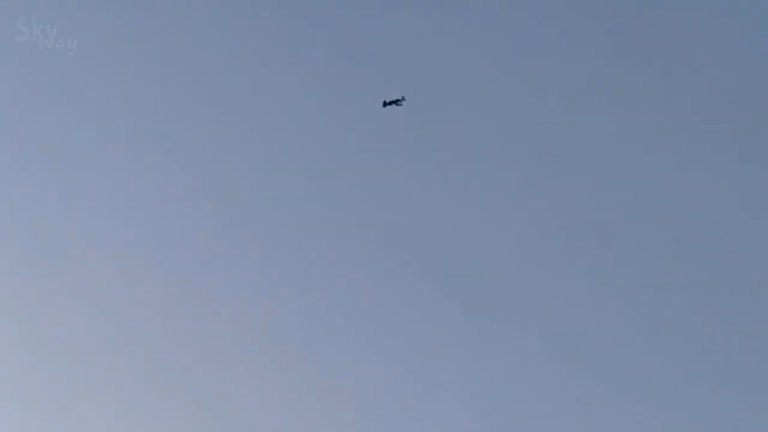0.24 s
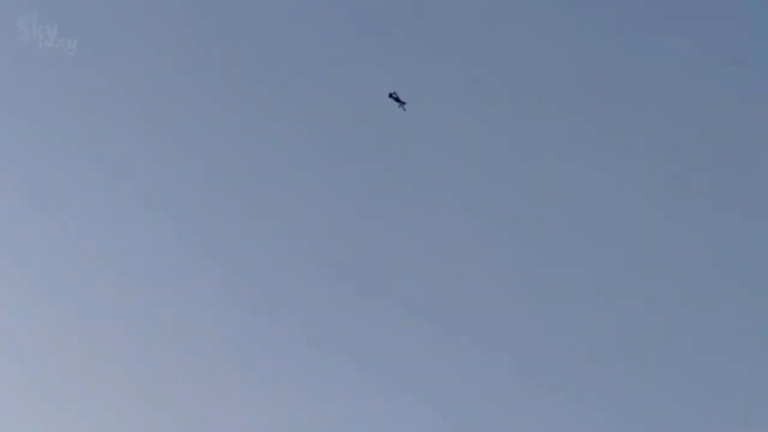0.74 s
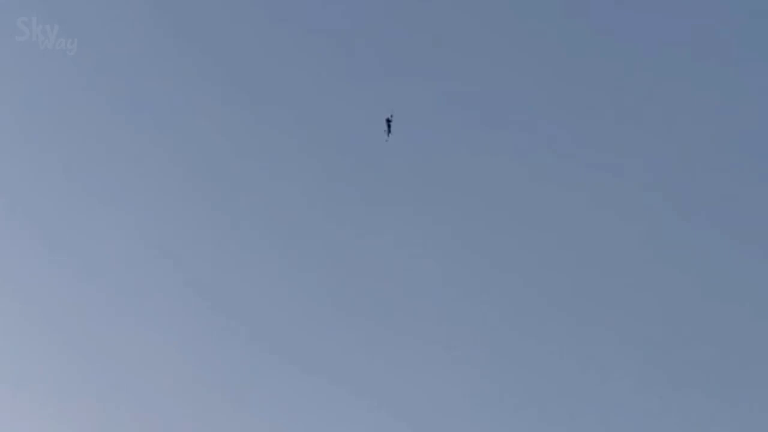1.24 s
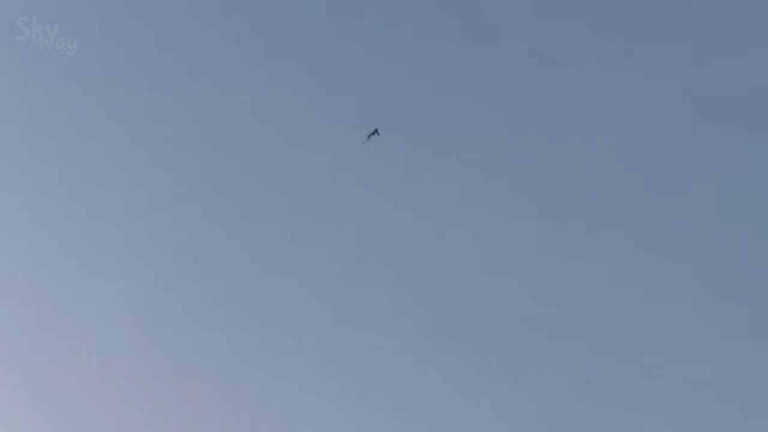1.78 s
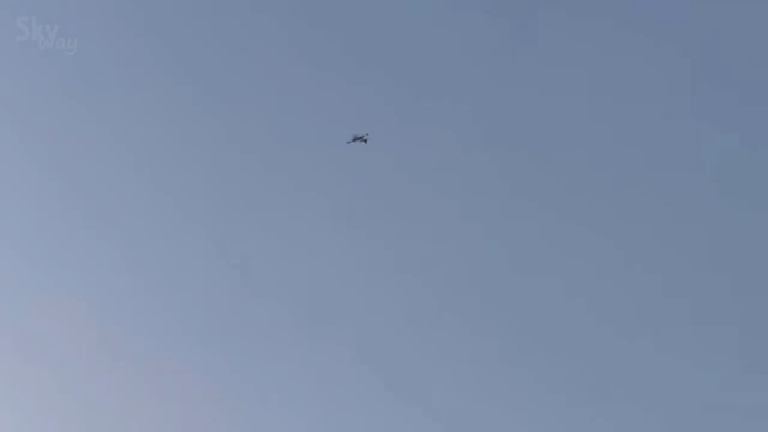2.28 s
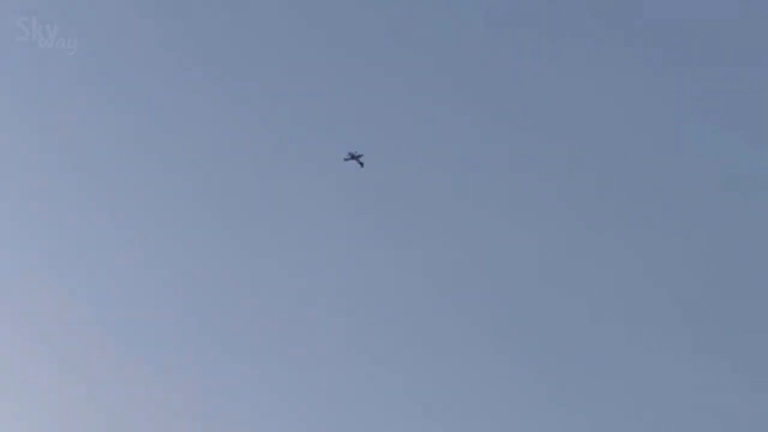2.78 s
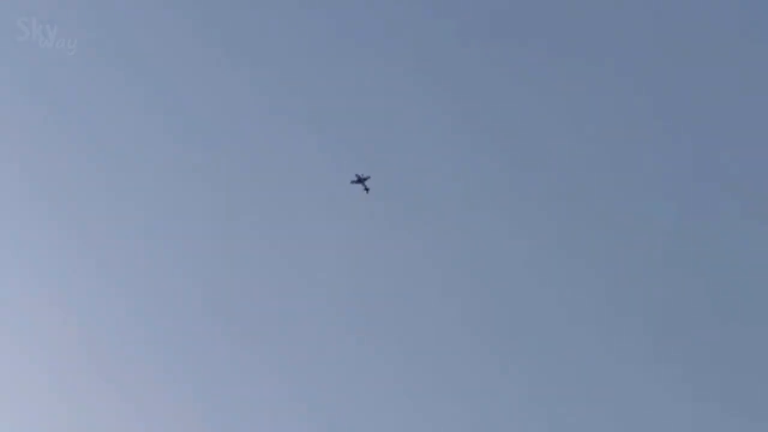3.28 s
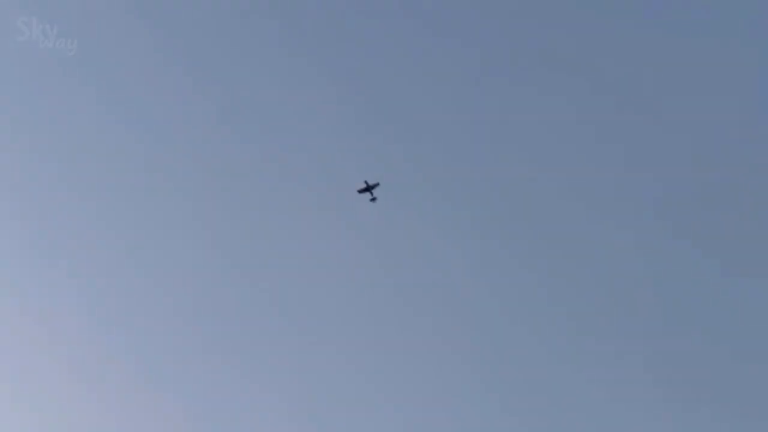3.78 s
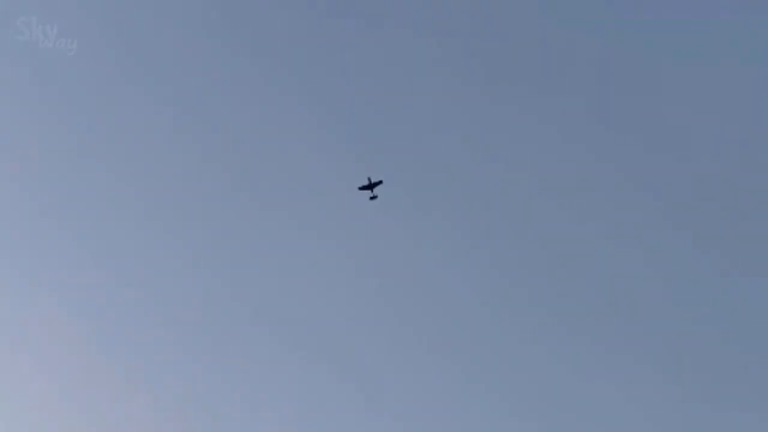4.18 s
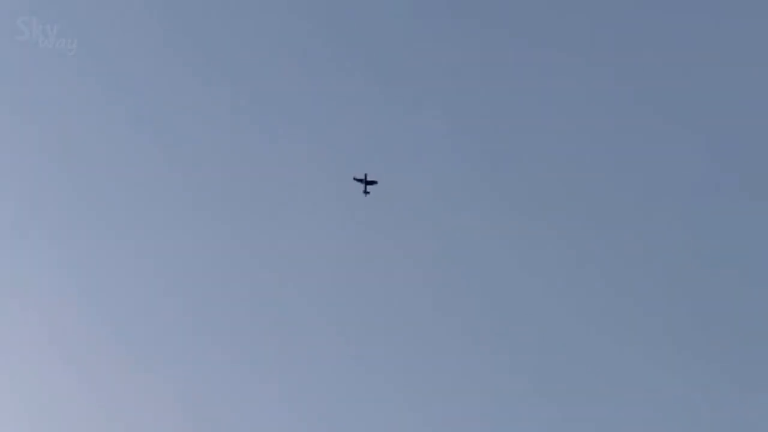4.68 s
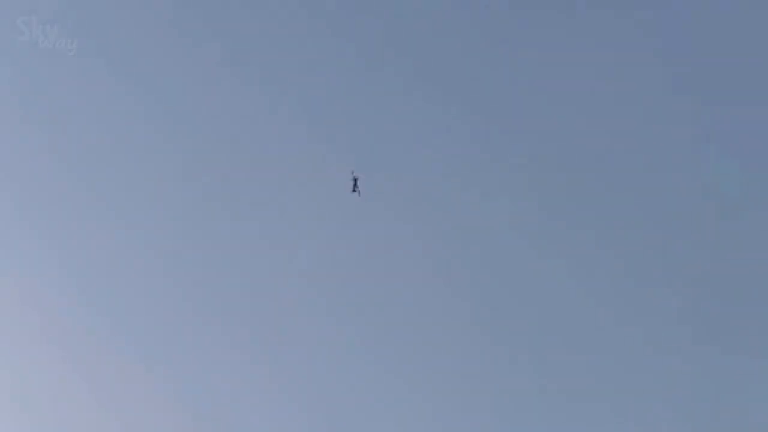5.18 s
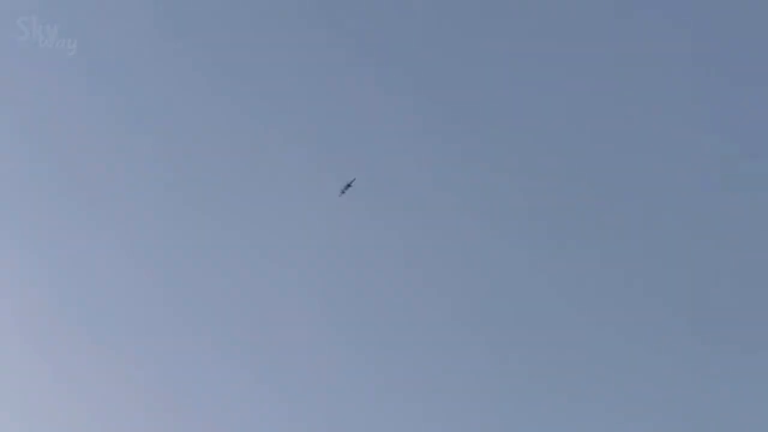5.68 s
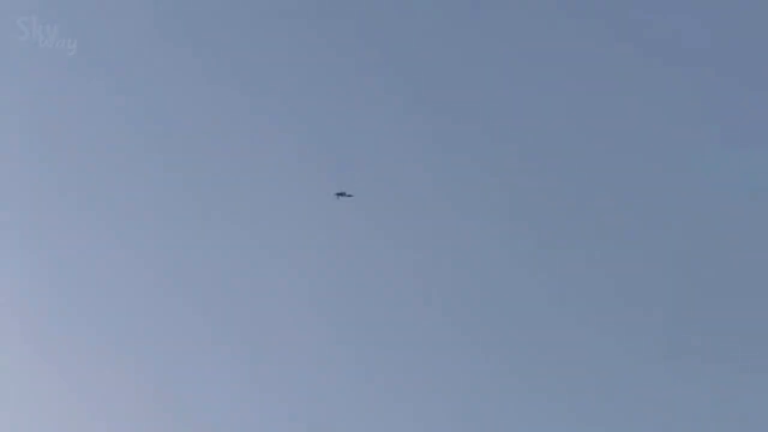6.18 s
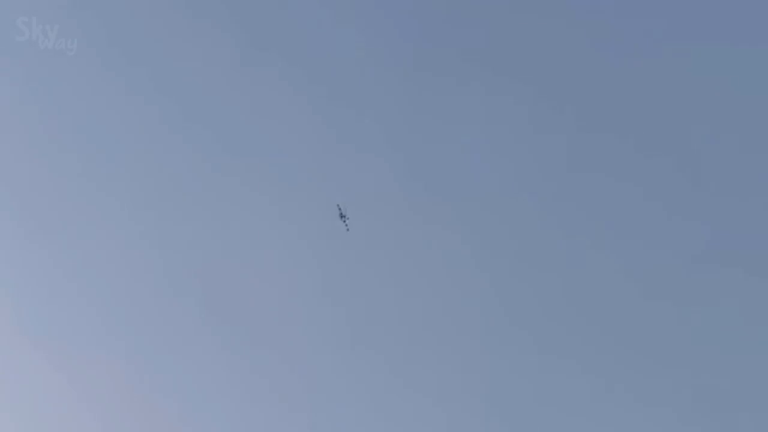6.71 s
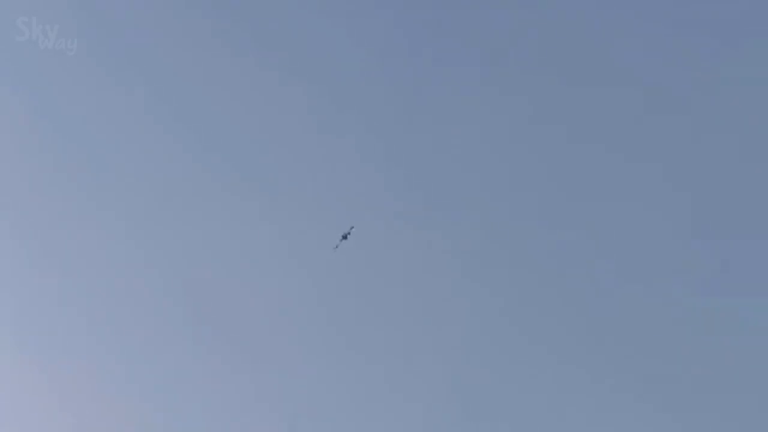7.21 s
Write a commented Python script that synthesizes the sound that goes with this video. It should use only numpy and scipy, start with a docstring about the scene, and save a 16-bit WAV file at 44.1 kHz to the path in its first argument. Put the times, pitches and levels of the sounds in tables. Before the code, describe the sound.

High above an open field, a small piston aeroplane drones steadily, a low buzzing hum with rough, fluttering exhaust rasp. The sound ebbs, crackles in quick gusts, then swells to a hard blade snarl around five seconds before weakening, with brief dropouts and a slowly rising pitch. Light low wind rumbles and soft thumps touch the close stereo microphone on the ground.

```python
"""A small six-cylinder aeroplane with a three-blade propeller, high above an open field, heard from the ground.
Blades and firings share one tone; uneven cylinders add lines between its multiples, made of wavering cosines.
Gas and blade wash rasp once a firing, as pulsed noise bands; the blades crack while their plane faces the listener.
The field returns a later, duller copy. Light wind rumbles and thumps on a two-port microphone, and a low
noise flutter sounds in short spells, opposite in the two channels."""
import sys
import numpy as np
from scipy import signal
from scipy.fft import rfft, irfft, next_fast_len
from scipy.io import wavfile
from scipy.ndimage import map_coordinates

SR = 44100
rng = np.random.default_rng(int(sys.argv[2]) if len(sys.argv) > 2 else 0)


def materialize(psi):
    """Save the field psi as 16-bit PCM at rate SR to the path in sys.argv[1].

    A 1-D psi becomes a single channel; in a 2-D psi each row is a channel.
    """
    bounded = np.clip(np.atleast_2d(psi).T, -1, 1)
    quanta = np.round(bounded * 32767).astype(np.int16)
    wavfile.write(sys.argv[1], SR, quanta)


N = 328545  # samples

# Bounce off the field. Each row: time in seconds, lag behind the direct sound in ms.
BOUNCE_LAG = [(0, 9.12), (1.3, 9.21), (2.8, 9.21), (4.75, 9.0), (7.45, 8.89)]
BOUNCE_GAIN = 0.47
CYLINDERS = 6  # firings in an engine cycle of two shaft turns, and as many blade passes
STEP = 8  # slow curves and low tones are worked out on every eighth sample
SLOW_S = np.arange(0, N + 32 * STEP, STEP) / SR


def propeller(turn, hz, tone_dbs):
    """Blade tone and multiples as they arrive, bounce included: cosines that peak together, save the second."""
    # Blade plane towards the listener. Each row: time in seconds, crack level in dB,
    # extra fall in dB per multiple above the 4th.
    crack = [(4.3, -53, 1), (4.53, -36, 7), (4.7, -36, 8), (4.8, -30.5, 1.5), (4.92, -31, 4.5),
             (5.01, -28.5, 3.5), (5.09, -23.5, 0.1), (5.19, -23, 2), (5.245, -26, 5.5), (5.29, -25.5, 1.5),
             (5.4, -28, 2.5), (5.5, -28.5, 2.5), (5.6, -30, 5.5), (5.7, -35, 5), (5.88, -39, 12),
             (6.05, -52, 1), (6.25, -46, 4)]
    # Each row: multiple of the blade tone, dB against the crack level.
    crack_shape = [(4, -1), (5, 0.5), (6, -5.5), (7, -3.5), (8, -7.5), (9, -13), (10, -6.5), (11, -10)]
    # Faint buzz of the high multiples. Each row: time in seconds, level in dB.
    buzz = [(0, -58), (.3, -49), (.55, -46.5), (.8, -50.5), (1.3, -55.5), (2.0, -64.5), (2.6, -51.5),
            (3.0, -56.5), (3.6, -58.5), (4.2, -52.5), (4.6, -49), (4.8, -49), (4.95, -39), (5.12, -43),
            (5.24, -49), (5.4, -44.5), (5.6, -53), (5.85, -50), (6.05, -59), (6.6, -62.5), (7.45, -60)]
    # Each row: multiple of the blade tone, dB against the buzz level.
    buzz_shape = [(4, 0.5), (5, -2), (6, -2.5), (7, 1.5), (8, -0.5), (9, -6.5), (10, 0.5), (11, -1),
                  (12, -7.5), (13, -8.5), (14, -6), (15, -4.5), (16, -6.5), (17, -9), (18, -8)]
    # The blade tone drops out briefly. Each row: time in seconds, depth in dB.
    dropouts = [(6.45, 9), (6.68, 22), (6.871, 15)]
    dropout_s = 0.038
    shake_db = 0.1  # per multiple
    # upper multiples weaker than steady_db fade in and out
    fade_db, fade_rate, steady_db, fade_span_db = 2.5, 14, -32.5, 20

    silent_before = (crack[0][0] - .3, -80, 0)
    silent_after = (crack[-1][0] + .2, -80, 0)
    crack_db, fall_db = curves([silent_before, *crack, silent_after])
    levels = dict(zip((1, 2, 3), tone_dbs))
    for s, depth_db in dropouts:
        levels[1] = levels[1] - depth_db * np.exp(-((SLOW_S - s) / dropout_s) ** 2)
    for k, db in crack_shape:
        levels[k] = crack_db + db - fall_db * (k - 4)
    buzz_db = curves(buzz)[0]
    for k, db in buzz_shape:  # crack and buzz add as powers
        power = undb(levels.get(k, -120)) ** 2 + undb(buzz_db + db) ** 2
        levels[k] = 10 * np.log10(power)

    lag_s = curves(BOUNCE_LAG)[0] / 1000
    out = 0
    for k, db in levels.items():
        # the bounce shifts the phase of what arrives
        shift = np.angle(1 + BOUNCE_GAIN * np.exp(-2j * np.pi * k * CYLINDERS * hz * lag_s))
        sign = -1 if k == 2 else 1  # the second multiple flattens the crests and deepens the troughs
        shake = (.5 + shake_db * min(k, 9)) * walk(35)  # moving air shakes short waves more
        weakness = np.clip((steady_db - db) / fade_span_db, 0, 1)
        fade = (k > 1) * fade_db * weakness * walk(fade_rate)
        phase = k * CYLINDERS * turn + shift + 0.012 * k * walk(20)
        out = out + sign * undb(db + shake + fade) * np.cos(phase)
    return np.sqrt(2) * fill(out)


def exhaust(turn):
    """Uneven cylinders sound multiples of the engine cycle; each line wavers on its own."""
    # Pipes turned away, then towards. Each row: multiple of the cycle, dB against the exhaust level
    # before a small fall with the multiple.
    pipes_away = [(1, -51), (2, -31), (3, -25.5), (4, -29), (5, -27.5), (6, 0), (7, -31), (8, -28),
                  (9, -27), (10, -30), (11, -27), (12, -23), (13, -38), (14, -22), (15, -23), (16, -29.5),
                  (17, -26.5), (18, -28), (19, -34), (20, -25.5), (21, -37), (22, -40), (23, -37.5),
                  (24, -31.5), (25, -34), (26, -25.5), (27, -35.5), (28, -37.5), (29, -40.5), (30, -44),
                  (31, -38.5), (32, -31), (33, -49.5), (34, -39), (35, -46.5), (36, -45), (37, -49),
                  (38, -51), (39, -49.5), (40, -49), (41, -42), (42, -39), (43, -38.5), (44, -35),
                  (45, -36), (46, -37), (47, -32.5), (48, -34.5)]
    pipes_near = [(1, -41), (2, -23), (3, -31.5), (4, -16.5), (5, -21), (6, -6), (7, -28.5), (8, 0.5),
                  (9, -8.5), (10, -12.5), (11, -25), (12, -5), (13, -15), (14, -6), (15, -30), (16, -29),
                  (17, -23), (18, -24), (19, -27.5), (20, -26.5), (21, -33), (22, -32.5), (23, -21.5),
                  (24, -20), (25, -33.5), (26, -32.5), (27, -20.5), (28, -34), (29, -19.5), (30, -23.5),
                  (31, -34.5), (32, -28), (33, -32), (34, -34.5), (35, -30.5), (36, -27), (37, -40.5),
                  (38, -33), (39, -37), (40, -38.5), (41, -23.5), (42, -31), (43, -19.5), (44, -28.5),
                  (45, -45), (46, -35), (47, -34), (48, -39.5)]
    # Each row: time in seconds, exhaust level in dB, share of pipes turned towards the listener (0-1).
    pipe_levels = [(0, -18, 0.03), (1.3, -19, 0.04), (2.4, -25, 0.08), (3.3, -18, 0), (4.2, -21, 0.05),
                   (5.1, -20, 0.31), (6.1, -25, 0.34), (6.4, -23.5, 0.46), (6.8, -27.5, 0.87),
                   (7.15, -29, 0.94), (7.45, -30.5, 0.99)]
    # The 8th multiple swells as the pipes swing round. Each row: time in seconds, rise in dB.
    boom = [(0, -0.5), (6.1, 0.5), (6.5, -0.5), (6.8, -1.5), (7.0, -1.5), (7.2, 2), (7.45, 4)]

    db, near = curves(pipe_levels)
    near = np.clip(near, 0, 1)
    boom_db = curves(boom)[0]
    out = 0
    for (k, away_db), (_, near_db) in zip(pipes_away, pipes_near):
        in_blade_tone = k % CYLINDERS == 0 and k <= 3 * CYLINDERS  # the propeller sounds these
        if k <= 3 or in_blade_tone:
            continue
        line_db = db + (1 - near) * away_db + near * near_db + (k == 8) * boom_db - 0.063 * k
        waver_db = 1.3 * walk(6) + 0.047 * k * walk(30)
        phase = k * turn + 2 * np.pi * rng.random() + 0.016 * k * walk(24)
        out = out + undb(line_db + waver_db) * np.cos(phase)
    return np.sqrt(2) * fill(out)


def rasp(turn):
    """Gas and blade wash: noise bursts on each firing over a steady rush; rows are mid and an unrelated twin."""
    # Each row: time in seconds, low roar, middle rasp and hiss in dB (each band keeps only the
    # departure from its mean), share that pulses with the firings (0-1).
    strength = [(0, -39, -43.5, -51, 0.6), (.22, -35, -37, -47.5, 0.6), (.45, -31.5, -34, -44, 0.62),
                (.65, -35, -35, -48.5, 0.38), (.95, -34.5, -36, -49.5, 0.55),
                (1.25, -39, -36.5, -48.5, 0.71), (1.65, -43.5, -43.5, -58.5, 0.1),
                (2.05, -41, -44.5, -53.5, 0.5), (2.28, -40.5, -41.5, -54, 0.66),
                (2.55, -36.5, -36, -51.5, 0.58), (2.8, -38.5, -44, -55, 0.6),
                (3.15, -41.5, -39.5, -54, 0.68), (3.45, -35, -41.5, -50.5, 0.5), (3.9, -38, -38, -47, 0.61),
                (4.24, -34, -37, -49, 0.59), (4.38, -33.5, -33.5, -44.5, 0.79),
                (4.65, -29, -28.5, -41, 0.65), (5.0, -30.5, -31.5, -40.5, 0.7),
                (5.12, -34.5, -31.5, -44, 0.42), (5.25, -33.5, -32.5, -47.5, 0.34),
                (5.56, -33.5, -34.5, -44, 0.4), (5.75, -33.5, -39, -47, 0.2),
                (5.9, -36.5, -38.5, -51, 0.23), (6.1, -39.5, -39.5, -53, 0.2), (6.5, -43, -41, -55, 0.43),
                (6.85, -37.5, -43, -59, 0.4), (7.45, -44, -43, -56, 0.44)]
    # Each row: frequency in Hz, relative dB per Hz.
    rasp_colour = [(60, -8), (140, -4), (300, -1), (600, 3.5), (1100, -2.5), (2000, -4), (2800, -9),
                   (3600, -17), (4900, -13.5), (6000, -20), (6900, -35.5), (9500, -34), (12000, -37.5),
                   (14000, -37.5), (15500, -45.5)]
    # Swell round a pitch that drifts as the plane turns. Each row: time in seconds, pitch in Hz.
    swell = [(0, 1100), (.3, 1650), (.45, 1430), (.65, 950), (1.1, 1690), (1.8, 1008), (2.4, 1350),
             (3.3, 1349), (3.9, 1620), (4.2, 1010), (4.7, 1980), (5.2, 1095), (5.8, 1900), (6.6, 2400),
             (7.45, 1990)]
    # Each cylinder's burst in relative dB, in firing order.
    cylinder_db = [5.5, 5, 2.5, 6, 3.5, 1.5]
    swell_top_db, swell_octaves = 3, 0.53
    rasp_db = -27  # on the coloured noise

    low_db, mid_db, high_db, pulsed = curves(strength)
    firing = CYLINDERS * turn / (2 * np.pi) + 0.58
    count = firing.astype(int)
    size, timing = rng.standard_normal((2000, 2)).T
    late = 0.074 * timing[count]  # in firings
    pulse = np.exp(0.92 * (np.cos(2 * np.pi * (firing + .5 + late)) - 1))
    burst = pulse * undb(2.4 * size[count] + np.array(cylinder_db)[count % CYLINDERS])
    burst = burst / np.sqrt(np.mean(burst ** 2))

    centres = 250 * 2 ** np.arange(0, 6, 1 / 3)
    out, patch, swell_hz = 0, walk(24), curves(swell)[0]
    for hz, gust_db, noise in zip(centres, gusts(centres), bands(rasp_colour, centres, channels=2)):
        low, high = np.clip(np.log2([1500 / hz, hz / 2200]) * 3.1, 0, 1)
        db = low * low_db + high * high_db + (1 - low - high) * mid_db
        swell_db = swell_top_db * np.exp(-(np.log2(hz / swell_hz) / swell_octaves) ** 2)
        # the bursts stand out most in the middle of the range
        share = np.clip(pulsed * np.exp(-np.log2(hz / 1800) ** 2 / 11), 0, 1)
        gate = 1 - share + share * burst
        gate = gate / np.sqrt(1 - 2 * share * (1 - share) * (1 - burst.mean()))  # pulsing keeps the power
        patch = 0.23 * patch + 0.88 * walk(16)  # neighbours share their flicker
        level_db = db - db.mean() + swell_db + gust_db + 2.5 * pulsed * patch
        out = out + fill(undb(level_db) * gate) * noise
    return out * undb(rasp_db)


def gusts(centres):
    """dB that crackling gusts and ringing streaks add to the rasp: bells in time and pitch, a row per band."""
    # Short gusts. Each row: time in seconds, rise in dB (below zero for a lull), centre in Hz.
    short_gusts = [(.12, 4.5, 2000), (.313, 3.5, 1700), (.37, 4, 1700), (.562, 1.5, 1100), (.62, 7, 1200),
                   (2.335, 9.5, 1380), (2.519, 9, 1495), (2.59, 3, 1300), (2.63, 9.5, 1499),
                   (2.71, 8, 1581), (2.82, 10, 1759), (2.9, 10, 1406), (2.755, -13, 1900), (2.86, 0, 1800),
                   (2.95, 0, 1900), (3.015, 11.5, 1990), (3.065, 6, 1290), (3.11, 7, 1350), (3.15, 2, 1300),
                   (3.2, 3.5, 1598), (3.245, 3, 2000), (3.38, -8, 1400), (3.73, 6.5, 1601),
                   (3.875, 12.5, 1760), (3.92, 7.5, 1595), (3.965, 9.5, 1780), (4.34, 2.5, 1610),
                   (4.46, 2.5, 1998)]
    # Narrow bands that ring out for a while. Each row: time in seconds, half length in seconds,
    # rise in dB, centre in Hz.
    streaks = [(0.293, 0.04, 8, 1000), (0.423, 0.07, 7, 1660), (0.495, 0.037, 4, 1346),
               (0.46, 0.065, 6, 2930), (.52, 0.019, 4, 980), (0.6, 0.094, 4.5, 950),
               (0.733, 0.037, 7, 1248), (3.4, .06, 3, 1490), (3.452, 0.033, 9, 1690),
               (3.596, 0.033, 2, 1390), (4.358, 0.083, 8, 930), (4.361, 0.033, 6.5, 1720),
               (4.63, 0.038, 7.5, 1001), (4.75, 0.027, 12, 861), (4.795, 0.035, 7, 2495),
               (4.95, 0.076, 8, 2300), (5.06, 0.029, 7, 2498), (5.12, 0.036, 2, 2140),
               (2.548, .03, 0, 1540), (3.0, .02, 8, 1000), (3.27, 0.035, 7.5, 1100),
               (3.34, 0.046, 11, 1900)]
    gust_s, gust_octaves, streak_octaves = 0.018, 0.58, 0.24

    rows = [(s, gust_s, db, hz, gust_octaves) for s, db, hz in short_gusts]
    rows += [(*row, streak_octaves) for row in streaks]
    s, span_s, db, hz, octaves = np.transpose(rows)
    in_time = np.exp(-((SLOW_S - s[:, None]) / span_s[:, None]) ** 2)
    in_pitch = np.exp(-(np.log2(centres[:, None] / hz) / octaves) ** 2)
    return db * in_pitch @ in_time


def ground(x):
    """The same sound later and duller, off the field; warm air makes the path waver."""
    grass_hz = 2870  # grass swallows the treble above this
    lag = fill(curves(BOUNCE_LAG)[0] / 1000 + 2e-5 * walk(12)) * SR
    dull = signal.sosfilt(signal.butter(1, grass_hz, fs=SR, output="sos"), x)
    lead = SR / (2 * np.pi * grass_hz)  # makes up for the delay that the dulling adds
    return BOUNCE_GAIN * np.interp(np.arange(N) - lag + lead, np.arange(N), dull)


def wind():
    """Low restless noise, with soft thumps as decaying low sines."""
    # Rumble. Each row: frequency in Hz, relative dB per Hz.
    rumble_colour = [(20, -17), (33, -19), (48, 2), (65, -5.5), (90, 0.5), (130, -0.5), (200, -9),
                     (400, -23.5), (900, -59.5)]
    # Each row: start in seconds, level in dB before onset and decay, pitch in Hz, 60 dB decay in seconds.
    thump_rows = [(.77, -19, 85.4, 0.16), (1.07, -18.5, 70.5, 0.11), (1.227, -14, 61.43, 0.13),
                  (2.89, -26.5, 72, .15), (3.738, -23, 58, 0.16), (4.02, -21, 51.76, 0.18)]
    rumble_db = -37.5

    centres = 30 * 2 ** np.arange(0, 3, .7)
    rumble = 0
    for noise in bands(rumble_colour, centres, channels=1):
        rumble = rumble + fill(undb(2.5 * walk(5.4))) * noise[0]
    thumps = 0
    for s, db, hz, t60 in thump_rows:
        t = np.maximum(SLOW_S - s, 0)
        envelope = (1 - np.exp(-t / 0.012)) * 1000. ** (-t / t60)
        thumps = thumps + undb(db) * envelope * np.sin(2 * np.pi * hz * t)
    return rumble * undb(rumble_db) / np.sqrt(np.mean(rumble ** 2)) + fill(thumps)


def side_flutter():
    """Low noise flutter in short spells, to be set opposite in the two channels."""
    # Each row: frequency in Hz, relative dB per Hz.
    flutter_colour = [(25, 0), (60, -1.5), (125, 8), (170, 2), (260, -43)]
    # Each row: start in seconds, end in seconds, level in dB.
    spells = [(.26, .36, -52), (.6, .65, -61), (0.691, 0.826, -50), (.87, 1.078, -47), (1.13, 1.37, -43),
              (1.392, 1.7, -63), (1.763, 1.812, -46), (1.86, 1.924, -48), (1.999, 2.037, -59),
              (2.513, 2.58, -53), (4.33, 4.391, -57), (4.45, 4.508, -49), (4.77, 4.809, -56),
              (5.039, 5.19, -62), (5.318, 5.587, -48), (5.66, 5.751, -50), (6.1, 6.159, -56),
              (6.43, 6.485, -54), (6.71, 6.751, -64), (7.09, 7.179, -61), (7.3, 7.363, -60)]
    edge_s = .012

    noise = next(bands(flutter_colour, [100.], channels=1))[0]
    on = 0
    for start, end, db in spells:
        rise, fall = np.tanh((SLOW_S - start) / edge_s), np.tanh((SLOW_S - end) / edge_s)
        on = on + undb(db) * (rise - fall) / 2
    return fill(on) * noise / np.sqrt(np.mean(noise ** 2))


def ports(direct, bounce, scatter):
    """Left-right difference of two close ports: each arrival has its own phase and weight."""
    # Each row: frequency in Hz, dB of side against mid before the weights below.
    port_colour = [(40, -58), (130, -58.5), (170, -33), (210, -23), (250, -8), (310, -13.5), (390, -7),
                   (700, -3.5), (1290, -2), (1950, -18), (2600, 3), (4400, -8.5), (7000, 12.5), (9000, 4),
                   (11000, -12.5), (15000, -20)]
    direct_weight, bounce_weight, scatter_weight = 0.39, 0.5, 0.35
    in_phase = -0.13  # part of the direct side signal that is in phase with the mid
    edge = 2048  # samples mirrored at both ends so that the filter starts and stops smoothly

    size = next_fast_len(N + 2 * edge)

    def spectrum(x):
        return rfft(np.pad(x, edge, mode="reflect"), size)

    gain = undb(colour(port_colour, np.arange(size // 2 + 1) * SR / size))
    turned = in_phase + 1j * np.sqrt(1 - in_phase ** 2)
    side = direct_weight * turned * spectrum(direct)
    side = side - 1j * bounce_weight * spectrum(bounce)
    side = side + scatter_weight * spectrum(scatter)
    return irfft(gain * side, size)[edge:edge + N]


def undb(db):
    """Amplitude of a level in dB."""
    return 10 ** (np.asarray(db) / 20)


def curves(table):
    """Columns of a table as curves in time."""
    s, *columns = np.transpose(table)
    return [np.interp(SLOW_S, s, c) for c in columns]


def colour(table, hz):
    """dB of a spectrum at hz, joined along log frequency."""
    f, db = np.transpose(table)
    return np.interp(np.log(np.maximum(hz, 1)), np.log(np.maximum(f, 1)), db)


def walk(rate):
    """Random levels, rate a second, joined smoothly; spread near 1."""
    place = SLOW_S * np.clip(rate, .1, 60)
    return 1.6 * map_coordinates(rng.standard_normal(512), [place], order=2, prefilter=False)


def bands(table, centres, channels):
    """Noise of the table's colour, split into overlapping bands that add up to the whole."""
    size = next_fast_len(N)
    hz = np.maximum(np.arange(size // 2 + 1) * SR / size, 1)
    noise = rfft(rng.standard_normal((channels, size))) * undb(colour(table, hz))
    for k in range(len(centres)):
        weight = np.interp(np.log(hz), np.log(centres), np.arange(len(centres)) == k)
        yield irfft(noise * weight, size)[:, :N]


def fill(slow):
    """Slow curve back to every sample."""
    return signal.resample_poly(slow, STEP, 1, padtype="line")[:N]


def scene():
    """Plane, ground bounce and wind at the two ports, with the flutter between channels."""
    # Each row: time in seconds, engine cycle in Hz, then dB of the blade tone, its 2nd and its 3rd multiple.
    tone = [(0.0, 20.14, -21, -35, -45), (0.2, 20.13, -21.5, -33, -64), (0.46, 20.38, -19, -30.5, -62),
            (0.62, 20.55, -21, -37, -39), (0.79, 20.81, -30.5, -33.5, -61), (0.92, 20.84, -23, -32.5, -40),
            (1.17, 20.96, -19, -46, -62), (1.5, 21.26, -19.5, -42.5, -54.5), (1.8, 21.06, -20, -41.5, -54),
            (2.12, 20.84, -20.5, -42.5, -57), (2.53, 20.66, -28.5, -39.5, -52.5),
            (2.72, 20.6, -25.5, -42.5, -60), (2.97, 20.54, -26, -35.5, -62), (3.55, 21.07, -17, -31.5, -52),
            (4.15, 21.42, -13.5, -27.5, -34), (4.79, 21.36, -14, -23, -30.5), (4.96, 21.67, -16, -23, -27),
            (5.05, 21.84, -18, -30, -28), (5.16, 22.01, -16.5, -36, -26.5), (5.3, 22.13, -17, -35.5, -29.5),
            (5.55, 22.28, -19.5, -31.5, -31), (5.72, 22.18, -22.5, -38.5, -40),
            (5.95, 22.26, -23.5, -33, -41), (6.2, 22.61, -24.5, -37, -48), (6.5, 23.02, -31, -48, -48),
            (6.83, 23.62, -28, -41, -54), (7.0, 23.9, -34, -36.5, -61), (7.32, 24.23, -36, -30, -57),
            (7.45, 24.16, -31, -28, -44)]
    hz, *tone_dbs = curves(tone)
    turn = 2 * np.pi * np.cumsum(hz) * STEP / SR  # phase of the engine cycle
    rush, scatter = rasp(turn)
    bounce = ground(rush)  # the tones are given as they arrive, bounce included
    direct = propeller(turn, hz, tone_dbs) + exhaust(turn) + rush + wind()
    side = ports(direct, bounce, scatter) + side_flutter()
    return direct + bounce + np.array([side, -side])


def record(dry):
    """An uneven sample clock mirrors every tone faintly into the treble; the top is cut."""
    # The converter reads a little early and late. Each row: rate in Hz, swing in samples.
    clock = [(3896.5, .2), (7803.5, .1), (11700, .07), (15596.5, .04)]
    top_hz = 15600
    slip = sum(swing * np.sin(2 * np.pi * hz * np.arange(N) / SR) for hz, swing in clock)
    uneven = dry + slip * np.gradient(dry, axis=1)
    return signal.sosfilt(signal.ellip(10, .2, 80, top_hz, fs=SR, output="sos"), uneven)


dry = scene()
out = record(dry)
materialize(out)
```